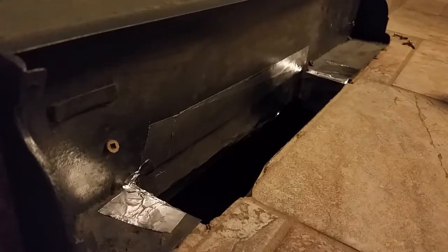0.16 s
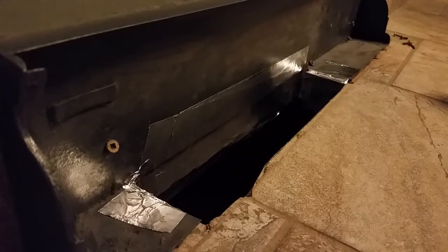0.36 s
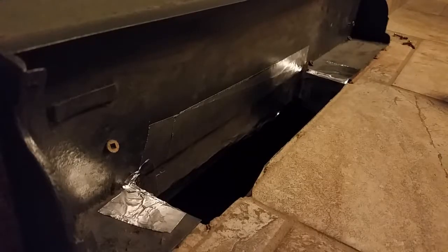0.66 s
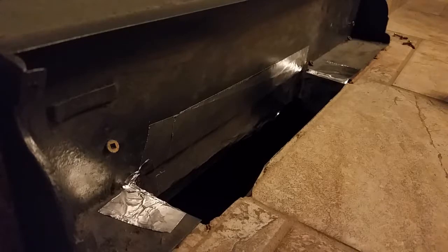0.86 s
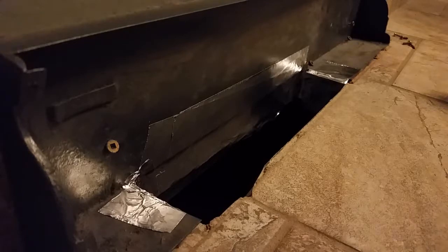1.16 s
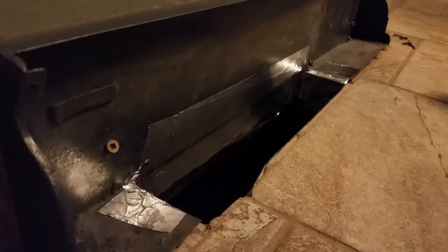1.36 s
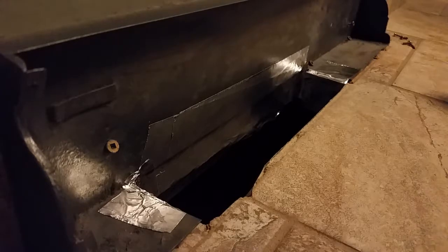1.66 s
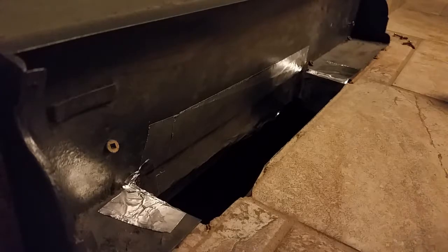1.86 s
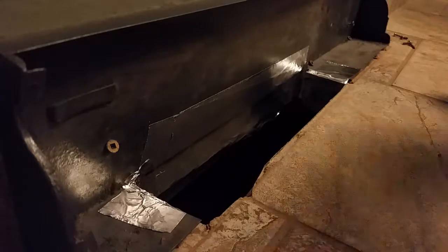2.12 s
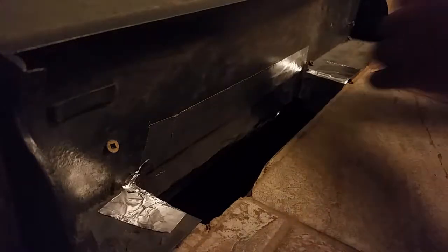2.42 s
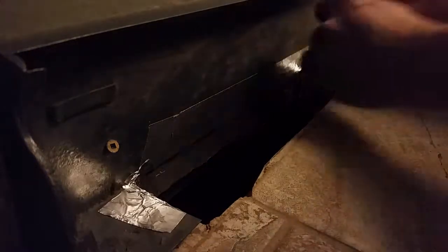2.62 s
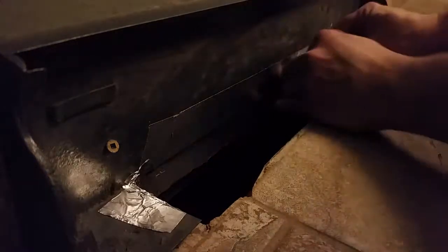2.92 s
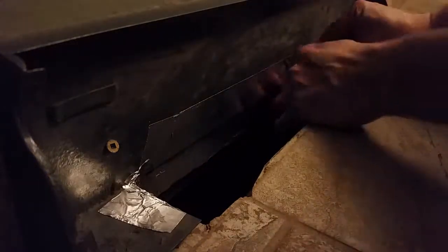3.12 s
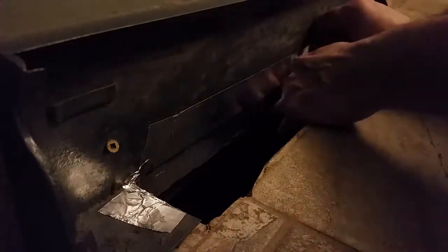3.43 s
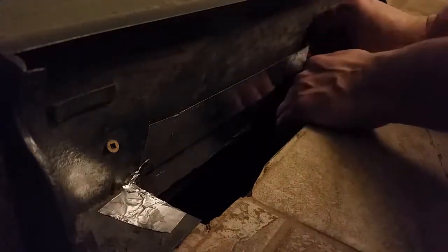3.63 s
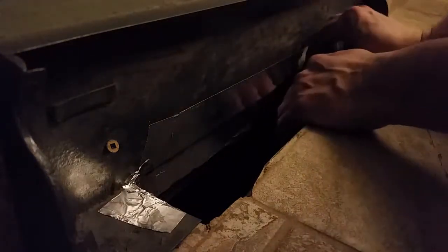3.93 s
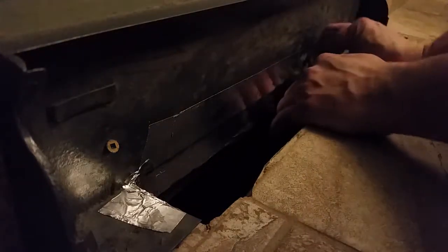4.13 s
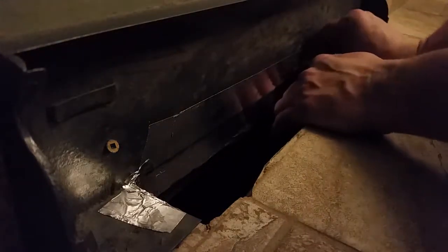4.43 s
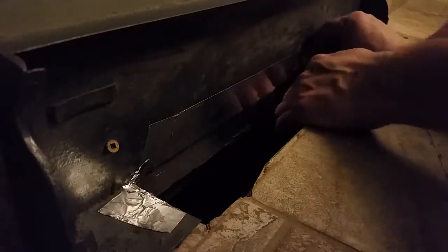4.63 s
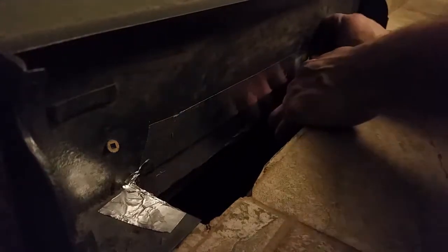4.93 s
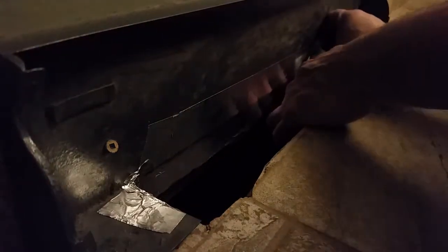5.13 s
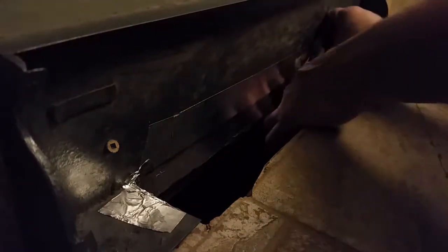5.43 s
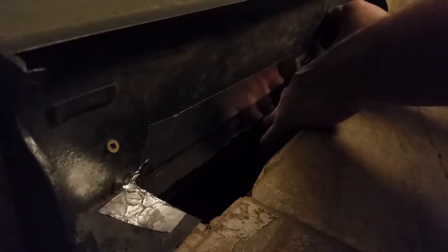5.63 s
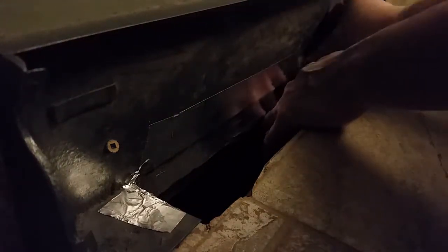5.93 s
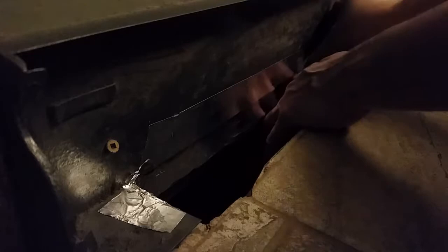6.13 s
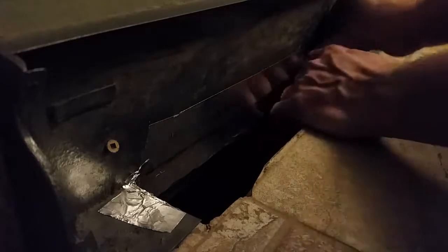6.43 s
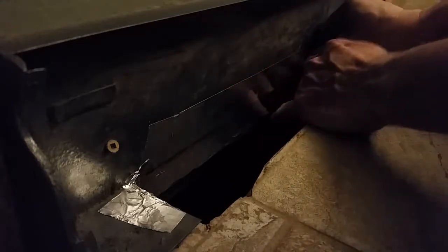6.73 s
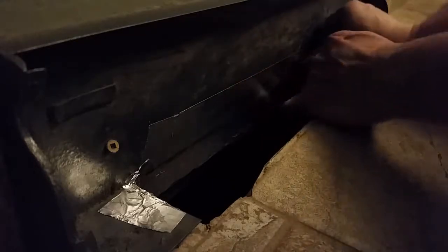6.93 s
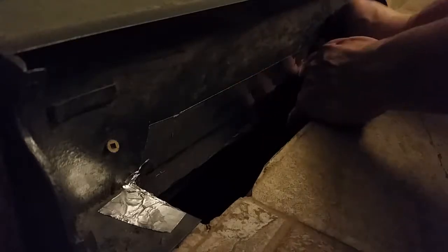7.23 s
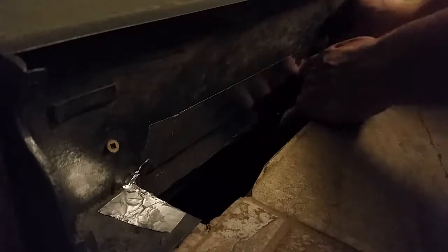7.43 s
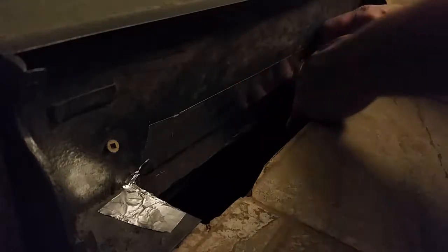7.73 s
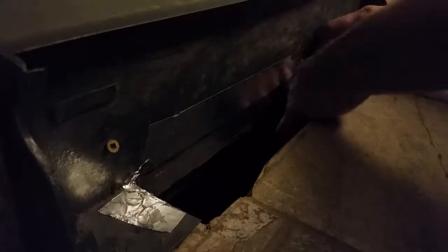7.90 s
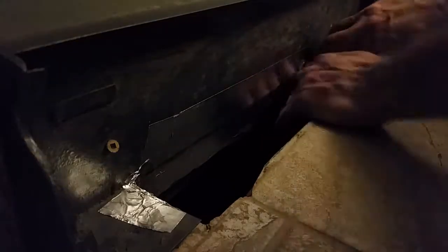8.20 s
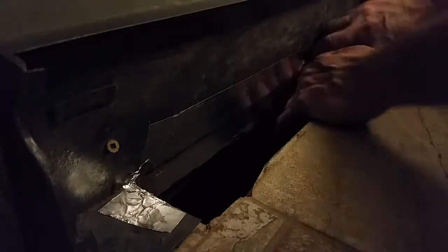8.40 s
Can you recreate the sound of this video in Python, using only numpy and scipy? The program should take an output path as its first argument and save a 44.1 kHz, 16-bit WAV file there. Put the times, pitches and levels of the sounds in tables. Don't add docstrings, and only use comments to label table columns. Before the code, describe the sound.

Close stereo pickup in a quiet tiled room with a faint low hum. Tiny foil ticks begin after half a second, then sharp bright snaps and rustling as tape is peeled. Hands press it onto sheet metal with loud crackles and dull thumps, then smooth it with hissing rubs, papery scuffs and smaller ticks.

```python
import sys
import numpy as np
from scipy import signal
from scipy.fft import rfft, irfft
from scipy.io import wavfile

SR = 44100
rng = np.random.default_rng(int(sys.argv[2]) if len(sys.argv) > 2 else 0)


def attenuation_scalar(level_db):
    decades = np.asarray(level_db, float) / 20
    return 10 ** decades


def waveform_to_disk(signal):
    frames = np.transpose(np.atleast_2d(signal))
    scaled = np.clip(frames, -1, 1) * 32767
    samples = np.round(scaled).astype(np.int16)
    wavfile.write(sys.argv[1], SR, samples)


N = 377496
SIZE, BURST = 8192, 4096
HZ = np.maximum(np.arange(SIZE // 2 + 1) * SR / SIZE, 1)
SNAP_LEAD_S = 0.004


def in_time(rows):
    s, *columns = np.transpose(rows)
    return [np.interp(np.arange(N) / SR, s, c) for c in columns]


def drift(rate):
    r = np.exp(-40 * np.pi * rate / SR)
    slow = signal.lfilter([1], [1, -2 * r, r * r], rng.standard_normal(N // 20 + 2002))
    slow = slow[2000:]
    return np.interp(np.arange(N) / 20, np.arange(len(slow)), slow / slow.std())


def two_ports(mid, side, alike):
    return np.sqrt(1 + alike) * mid + np.sqrt(1 - alike) * side * [[1], [-1]]


def pair(alike):
    mid, side = rng.standard_normal((2, N))
    return two_ports(mid, side, np.clip(alike, 0, 1)) / np.sqrt(2)


def band_pass(x, low_hz, high_hz, order=1):
    return signal.sosfilt(signal.butter(order, [low_hz, high_hz], "band", fs=SR, output="sos"), x)


def placed(sounds, times):
    out = np.zeros((2, N + sounds.shape[-1]))
    for sound, s in zip(sounds, times):
        at = int(s * SR)
        out[:, at:at + sound.shape[-1]] += sound
    return out[:, :N]


def at_hz(points):
    hz, level_db = np.array(points).T
    return np.interp(np.log(HZ), np.log(hz), level_db)


# (f [Hz], level [dB per Hz])
LEFT_PORT = [(25, 7), (100, 11.5), (300, 6), (1000, -6.5), (1450, 1), (2000, -5), (2600, -7.5),
             (4000, -5.5), (5200, -7), (7600, 3.5), (8600, -5.5), (13500, -9), (15500, 1)]
RIGHT_PORT = [(25, 10.5), (100, 14.5), (300, 3), (1000, -7), (1550, -3), (2600, -8), (4000, -16),
              (5800, -18), (8600, -3), (9600, 6), (14600, -0.5), (15500, 9)]


def through_ports(x, low_hz, high_hz):
    edges = 1 / np.sqrt((1 + (low_hz / HZ) ** 10) * (1 + (HZ / high_hz) ** 10))
    gain = attenuation_scalar(np.array([at_hz(LEFT_PORT), at_hz(RIGHT_PORT)])) * edges
    gain = gain / np.sqrt(np.mean(gain ** 2) / 2)
    cepstrum = irfft(np.log(gain + 1e-5), SIZE)
    cepstrum[:, 1:SIZE // 2] *= 2
    cepstrum[:, SIZE // 2 + 1:] = 0
    response = irfft(np.exp(rfft(cepstrum)), SIZE)[:, :int(40 * SR / low_hz)]
    return signal.oaconvolve(x, response, axes=1)[:, :N]


# (t [s], hum level [dB], rumble level [dB])
ROOM_LEVELS = [(0.0, -70.5, -79.5), (1.07, -66.5, -76), (1.4, -63, -74.5), (3.38, -60.5, -70),
               (3.69, -66, -73.5), (7.77, -62.5, -68.5), (8.56, -56, -62)]
HUM_HZ = 100


def hum():
    hum_db, rumble_db = in_time(ROOM_LEVELS)
    phase = 2 * np.pi * HUM_HZ * np.arange(N) / SR + 0.78 * drift(6.0)
    line = np.sqrt(2) * np.sin(phase) * attenuation_scalar(hum_db + 2.3 * drift(7.4)) * attenuation_scalar([[-1.5], [1.2]])
    hiss = through_ports(pair(0.05) * attenuation_scalar(-87.5), 3300, 4700)
    rumble = through_ports(pair(0.83) * attenuation_scalar(rumble_db + 3.0 + 2.2 * drift(6.6)), 22, 135)
    return line + hiss + rumble


# (t [s], weight on the panel [dB], slide over the foil [dB])
HANDS = [(0.0, -73.5, -97), (0.9, -71.5, -82.5), (1.15, -67.5, -59.5), (1.9, -63.5, -57.5),
         (2.44, -54.5, -48.5), (2.8, -59, -46), (3.27, -60.5, -61), (3.55, -58, -57.5),
         (3.77, -66.5, -72.5), (4.18, -64, -68.5), (4.56, -66.5, -73), (5.28, -62.5, -66.5),
         (5.85, -67, -72), (6.3, -65.5, -73), (6.84, -63, -78), (7.199, -63, -65), (7.75, -62.5, -61.5),
         (8.56, -55.5, -56)]
# (peak t [s], fade [s], level [dB], brightness [dB])
PEEL_STROKES = [(0.509, 0.16, -61.5, 6), (1.109, 0.086, -64, 14), (1.43, 0.11, -53.5, 8),
                (1.54, 0.21, -42, 4.5), (1.78, 0.07, -44.5, 7.5), (2.466, 0.042, -47, 8),
                (2.612, 0.24, -40.5, 7.5), (2.836, .03, -44, 5), (2.858, 0.071, -39, 1),
                (3.004, 0.16, -38.5, 2.5), (3.175, 0.08, -38, 0), (3.478, 0.054, -34.5, 4),
                (3.624, 0.073, -58, 4), (3.926, 0.054, -53.5, -1.5), (4.233, 0.073, -42, 0.5),
                (4.4, 0.13, -42, 0), (4.612, 0.03, -57.5, -3.5), (5.094, 0.1, -36.5, 0.5)]
# (peak t [s], fade [s], level [dB], brightness [dB])
RUB_STROKES = [(5.412, 0.49, -63, 1), (5.675, 0.27, -61, 0.5), (5.893, 0.079, -59, 4),
               (6.122, 0.034, -62, -4), (6.242, 0.04, -52.5, 0), (6.4, 0.57, -49.5, 5),
               (6.537, 0.26, -49, -1.5), (6.657, 0.11, -46, 1), (6.904, 0.064, -49.5, -1),
               (6.983, 0.14, -51, 5), (7.413, 0.083, -43.5, 1.5), (7.677, 0.22, -47, 2.5),
               (7.87, 0.24, -52.5, 0), (8.021, 0.03, -48, -5), (8.43, 0.19, -51, 1.5),
               (8.493, 0.031, -45.5, -3.5)]
# (peak t [s], fade [s], level [dB], brightness [dB], start t [s])
SWIPES = [(7.297, 0.09, -35, 3.5, 7.257), (7.568, 0.037, -44, -1.1, 7.55), (8.163, 0.046, -45, 2.5, 8.135),
          (0.37, .4, -90, 13, 0.25), (8.424, .03, -39.5, 0.2, 8.404), (3.33, .16, -62, 9, 3.314),
          (4.85, .16, -42.5, .4, 4.799)]
# (level [dB], share of brightness, share of level, slowness)
FOLLOW = [
    (-8, -1.7, 0.85, 1.44),
    (-4, -0.25, 1.126, 0.92),
    (0.2, 0.68, 0.97, 0.84),
    (-14.5, -0.9, 0.98, 1.6),
]
# (level [dB], share of weight, share of slide)
REST = [
    (-5, 1.31, 0.25),
    (-2.4, 0.43, 0.78),
    (1.5, -0.33, 1.23),
    (-2, 0.92, 0.015),
]
STILL_DB = [-103, -108, -83, -95]
FADE_DB, ROUNDNESS = 19, 1.014
RISE_SHARE, SWIPE_RISE_SHARE = 0.63, 1.2
BREAK_S = 0.0025


def effort(zone):
    t = np.arange(0, N + 64, 64) / SR
    rows = [(*row, -1) for row in PEEL_STROKES + RUB_STROKES] + SWIPES
    s, fade, level_db, bright_db, start = np.transpose(rows)[:, :, None]
    offset_db, by_bright, by_level, slowness = FOLLOW[zone]
    rise_share = np.where(start < 0, RISE_SHARE, SWIPE_RISE_SHARE)
    away = np.maximum(t - s, (s - t) / rise_share) / (fade * slowness)
    peak_db = offset_db + by_bright * bright_db + by_level * (level_db + 60)
    strokes = attenuation_scalar(peak_db - FADE_DB * away ** ROUNDNESS)
    strokes = strokes * np.clip((t - start) / BREAK_S, 0, 1)
    at, weight_db, slide_db = np.transpose(HANDS)
    offset_db, by_weight, by_slide = REST[zone]
    rest_db = offset_db + by_weight * (weight_db + 60) + by_slide * (slide_db + 60)
    rest = attenuation_scalar(np.interp(t, at, rest_db))
    power = attenuation_scalar(STILL_DB[zone] + 60) ** 2 + rest ** 2 + np.sum(strokes ** 2, axis=0)
    return np.interp(np.arange(N) / SR, t, 10 * np.log10(power) - 60)


# (t [s], peak level [dB], f [Hz], t60 [s])
THUMPS = [(1.311, -39.5, 100, 0.65), (1.3, -45, 302, 0.27), (1.484, -31.5, 290, 0.057),
          (1.525, -37.5, 280, 0.25), (1.83, -21, 110, 0.041), (1.91, -33, 460, 0.1),
          (2.533, -41, 500, 0.052), (2.571, -42.5, 250, 0.073), (2.64, -42.5, 200, 0.13),
          (2.688, -44, 300, 0.14), (2.86, -18, 169, 0.26), (3.035, -27.5, 202, 0.14),
          (3.153, -25, 247, 0.096), (3.406, -33, 380, 0.2), (4.226, -34.5, 237, 0.66), (4.3, -40, 85, .4),
          (4.806, -24, 825, 0.037), (5.11, -38, 375, 0.37), (6.2, -44.5, 168, 0.29),
          (6.506, -31.5, 600, 0.2), (6.861, -32.5, 400, 0.13), (7.02, -37.5, 330, 0.11),
          (7.065, -45.5, 450, 0.093), (7.22, -46, 300, .1), (7.258, -33, 151, 0.16), (7.84, -23, 148, 0.26),
          (7.87, -33, 260, .55), (8.128, -38, 209, 0.58), (8.195, -30, 171, 0.064), (8.228, -34, 145, 0.12),
          (8.486, -32, 570, 0.15)]


def thumps():
    t, sounds = np.arange(SIZE) / SR, []
    rough = rng.standard_normal((len(THUMPS), 3, SIZE))
    for (s, peak_db, hz, t60), noise in zip(THUMPS, rough):
        wobble = band_pass(noise[0] + 0.46 * noise[1:], 0.59 * hz, 1.14 * hz)
        tone = np.sin(2 * np.pi * hz * t) * attenuation_scalar(-60 * t / (0.2 * t60))
        tail = 0.32 * wobble / wobble.std() * attenuation_scalar(-60 * t / t60)
        soft_touch = 1 - np.exp(-3.0 * hz * t)
        sounds.append(attenuation_scalar(peak_db - 1.0) * (tone + tail) * soft_touch)
    knocks = placed(np.array(sounds), np.array(THUMPS)[:, 0]) * attenuation_scalar([[-1.3], [1.3]])
    knocks = signal.sosfilt(signal.butter(4, 70, "high", fs=SR, output="sos"), knocks)
    handling = pair(0.7) * attenuation_scalar(effort(zone=3) + 3.0 * drift(20))
    return knocks + through_ports(handling, 120, 600)


# (middle t [s], length [s], rms level [dB], flap f [Hz])
SCUFFS = [(4.839, 0.055, -46, 750), (4.866, 0.03, -38, 790), (4.893, 0.03, -47, 780),
          (3.856, 0.06, -57.5, 1270), (4.996, 0.034, -48.5, 780), (4.96, .02, -55, 750),
          (7.07, .06, -58.5, 1310), (6.538, 0.12, -43, 705), (6.416, 0.13, -55.5, 1420),
          (6.653, 0.11, -50, 1310), (7.312, 0.075, -42.5, 1670), (7.424, 0.052, -42.5, 1460),
          (7.66, 0.12, -47.5, 1390), (8.023, 0.03, -48.5, 1600), (8.419, 0.033, -41, 1300)]
FLAP_WIDTH = 0.07
OVERTONE_HZ, OVERTONE_DB_PER_KHZ = 680, -7
SLIP_DB = 3.5


def scuffs():
    t, sounds = np.arange(SIZE) / SR, []
    slips = rng.standard_normal((len(SCUFFS), 4, SIZE))
    for (s, length, level_db, hz), noise in zip(SCUFFS, slips):
        grain = attenuation_scalar(SLIP_DB * np.interp(t, np.arange(64) * 0.004, noise[3, :64]))
        drive, flap = grain * (noise[0] + noise[1:3]), 0
        for mode_hz, mode_db in (hz, 0), (hz + OVERTONE_HZ, OVERTONE_DB_PER_KHZ * hz / 1000):
            mode = band_pass(drive, mode_hz / (1 + FLAP_WIDTH), mode_hz * (1 + FLAP_WIDTH))
            flap = flap + attenuation_scalar(mode_db) * mode
        flap = flap * np.sin(np.pi * np.minimum(t / length, 1) ** 0.79)
        sounds.append(attenuation_scalar(level_db - 3) * flap / flap[:, t < length].std())
    return placed(np.array(sounds), [s - length / 2 for s, length, *_ in SCUFFS])


def patchy_hiss(patchy_db, rate, alike_hz):
    edges, white, out = np.geomspace(500, 19000, 17), rng.standard_normal((2, 2, N)), 0
    for k, (low, high) in enumerate(zip(edges, edges[1:])):
        mid, side = band_pass(white[k % 2], low, high, order=2)
        alike = np.clip(alike_hz / low - 0.1, 0, 0.9)
        out = out + attenuation_scalar(patchy_db * drift(rate)) * two_ports(mid, side, alike)
    return out / out.std()


def crackle(per_s, spread_db, cycles):
    sizes = attenuation_scalar(spread_db * np.minimum(rng.exponential(1, N), 2.4))
    happens = rng.random(N) < per_s * attenuation_scalar(5 * drift(30)) / SR
    clicks = sizes * happens * rng.choice([-1, 1], (2, N))
    patch, out = rng.integers(0, 20, N), 0
    for k, hz in enumerate(np.geomspace(650, 15000, 20)):
        r, w = attenuation_scalar(-60 * hz / (cycles * SR)), 2 * np.pi * hz / SR
        struck = clicks * (patch == k) + 1e-18
        out = out + hz * signal.lfilter([0, np.sin(w)], [1, -2 * r * np.cos(w), r * r], struck)
    return out / out.std()


def facets(count, spread_db, width_hz):
    noise = rng.standard_normal((count, 3, BURST))
    knots = rng.standard_normal((count, 64))
    hz = np.arange(BURST // 2 + 1) * SR / BURST
    bumps = attenuation_scalar(spread_db * np.array([np.interp(hz / width_hz, np.arange(64), k) for k in knots]))
    bumps /= np.sqrt(np.mean(bumps ** 2, axis=1, keepdims=True))
    ports = noise[:, 1:] + 0.054 * noise[:, :1]
    return irfft(rfft(ports) * bumps[:, None], BURST)


def snap_envelope(levels_db, crack_t60, tail_t60, tail_db):
    t = np.arange(BURST) / SR - SNAP_LEAD_S
    build = attenuation_scalar(60 * np.minimum(t, 0) / 0.0057)
    after = np.maximum(t, 0)
    crack = 0.68 * attenuation_scalar(-60 * after / 0.0035) + attenuation_scalar(-60 * after / crack_t60)
    tail = attenuation_scalar(tail_db)[:, None] * attenuation_scalar(-60 * after / tail_t60)
    return (attenuation_scalar(levels_db)[:, None] * build * (crack + tail))[:, None]


def evened(noise, envelope, low_hz, high_hz):
    hz = np.arange(BURST // 2 + 1) * SR / BURST
    burst = noise * envelope
    inside = rfft(burst)[..., (hz > low_hz) & (hz < high_hz)]
    got = np.mean(np.abs(inside) ** 2, axis=(1, 2), keepdims=True)
    return burst * np.sqrt(np.sum(envelope ** 2, axis=2, keepdims=True) / got)


# (t [s], peak level [dB], body re peak [dB], rustle re peak [dB])
PEEL_SNAPS = [(0.513, -31.5, -48, -37), (0.7457, -56, -15, -17), (0.8001, -58, -18, -19),
              (0.857, -50, -22, -29), (0.9163, -50, -27, -26), (0.9433, -46.5, -34, -29),
              (1.0066, -36, -43, -23), (1.0281, -32, -54, -26), (1.0854, -27, -53.5, -19),
              (1.4227, -17, -40, -23), (1.4365, -19, -40, -29), (1.478, -23.5, -35, -24),
              (1.5237, -13.5, -27, -15.5), (1.5356, -14, -28, -14), (1.5698, -22, -21.5, -20),
              (1.7444, -27, -39, -18), (1.7814, -24, -34, -19), (1.7978, -15.5, -40, -19),
              (1.9111, -16.5, -24, -21.5), (2.008, -22, -38, -20)]
LAY_SNAPS = [(2.4575, -12, -30, -11), (2.4708, -21, -23, -12), (2.4798, -25, -32, -5),
             (2.5353, -29, -30, -15), (2.602, -20, -42, -16), (2.6192, -17.5, -49, -18),
             (2.6356, -17.5, -30, -11.5), (2.6923, -16.5, -23, -16), (2.7192, -12.5, -32, -18),
             (2.844, -8, -31, -13.5), (2.8601, -22, -4, -21), (2.9909, -9, -20, -13),
             (3.034, -18.5, -10.5, -12), (3.1547, -10.5, -14.5, -14), (3.2028, -22.5, -10.5, -11),
             (3.407, -12, -24, -13.5), (3.4605, -12.5, -28, -17), (3.4762, -18, -22, -24),
             (3.4945, -18, -26, -13.5), (3.6047, -34, -24, -23), (3.8433, -35, -18, -13.5),
             (4.032, -32.5, -22, -11)]
PRESS_SNAPS = [(4.154, -45, -21, -5), (4.2266, -22, -13, -19), (4.2388, -16.5, -19, -9.5),
               (4.2844, -24.5, -16, -7.5), (4.3127, -20, -18.5, -12.5), (4.3459, -17, -17, -8),
               (4.3846, -14, -45, -15.5), (4.4545, -34, -1.5, 1), (4.5982, -50.5, 4, -17),
               (4.685, -33.5, -16, -9.5), (4.7248, -24.5, -27, -15), (4.77, -39, -2.5, -15),
               (4.788, -28.5, -34, -5), (4.801, -21, -13.5, -30), (4.8364, -28.5, -8, -11),
               (5.0719, -11.5, -14, -9.5), (5.085, -18, -27, -16), (5.101, -29, -17, -15),
               (5.1105, -13, -14.5, -7), (5.122, -21, -6, -8), (5.3957, -26, -42, -17),
               (5.5386, -38.5, -22, -22), (5.5802, -37.5, -16, -26), (5.658, -32, -48, -7),
               (5.688, -33.5, -31, -8.5), (5.7635, -37.5, -19, -9.5), (5.809, -49.5, -13, -2),
               (5.88, -28.5, -43, -15)]
SMOOTH_SNAPS = [(5.964, -33.5, -22.5, -13), (6.112, -24, -33, -21), (6.194, -33, -38, -17),
                (6.2236, -31, -20, -9.5), (6.239, -31.5, -60.5, -7.5), (6.4435, -26, -14, -11.5),
                (6.5066, -26.5, -2.5, -26), (6.69, -34, -12, -17), (6.7836, -33.5, -25, -23),
                (6.89, -28, -15, -15), (6.8962, -32, -9, -8), (6.9115, -28, -24, -7),
                (6.9205, -18, -34, -12.5), (7.09, -41, -14, -7.5), (7.4708, -26.5, -11, -5.5),
                (7.5545, -41, -47, -12), (7.841, -34, 6, -4), (8.2414, -24.5, -40, -12.5),
                (8.4051, -21.5, -12.5, -8.5), (8.4862, -30, -11, -21.5)]
# (t [s], peak level [dB], body re peak [dB], rustle re peak [dB])
GLUE_TICKS = [(.585, -49, -30, -19.5), (.7, -55, -27, -25), (0.975, -49, -41, -25), (1.04, -40, -40, -27),
              (1.2414, -40, -27, -22), (2.572, -34, -13, -15), (3.094, -29, -16, -12),
              (3.125, -31, -5, -10), (3.14, -31, -6, -14), (3.2409, -37, -18, -5), (3.3147, -37, -26, -22),
              (3.3687, -33, -24, -20), (3.3905, -24, -27, -22), (3.4, -23, -19, -15),
              (3.451, -23, -27, -16), (4.41, -35, -10, -5), (4.493, -42, -16, -14), (4.51, -42, -25, -20),
              (5.337, -41, -36, -14), (5.36, -41, -36, -15), (5.41, -42, -36, -14), (5.6465, -45, -28, -8),
              (5.7, -39, -25, -10), (5.798, -46, -28, -13), (5.8892, -30.5, -35, -13),
              (5.937, -42, -25, -18), (5.95, -36, -26, -16), (6.0782, -47, -20, -14),
              (6.118, -25.5, -23, -17), (6.205, -41, -31, -6), (6.213, -36, -35, -10),
              (6.233, -32, -23, -10), (6.25, -35, -26, -14), (6.262, -34, -28, -11), (6.279, -40, -28, -11),
              (6.8571, -44, -10, -10), (6.8733, -38.5, -14, -12), (7.2178, -51, -11, -13),
              (7.482, -41, -20, -9), (8.0146, -37, -12, -15), (8.168, -32, -17, -14),
              (8.2198, -34, -32, -18), (8.4595, -35, -10, -16)]


def creases():
    return np.transpose(PEEL_SNAPS + LAY_SNAPS + PRESS_SNAPS + SMOOTH_SNAPS + GLUE_TICKS)


# (low f [Hz], high f [Hz], crackle share, flicker [dB], crack t60 [s], tail t60 [s])
ZONES = [
    (600, 3710, 0.32, 1.0, 0.016, 0.22),
    (3910, 7220, 0.23, 1, 0.018, 0.26),
    (7990, 13400, 0.16, 2.5, 0.015, 0.18),
]
CREST_DB = [6.5, 5, 12]
TAIL_DB, TAIL_PER_BODY_DB, TAIL_PER_PEAK_DB = -13, 0.02, 0.23


def foil():
    s, peak_db, body_db, rustle_db = creases()
    tail_db = TAIL_DB + TAIL_PER_BODY_DB * body_db + TAIL_PER_PEAK_DB * peak_db
    coloured = facets(len(s), spread_db=5.2, width_hz=700)
    small = crackle(500, spread_db=2.5, cycles=3.8)
    hiss = patchy_hiss(patchy_db=3.0, rate=13.9, alike_hz=446)
    together, out = drift(26), 0
    above_peak_db = [body_db, rustle_db, 0]
    for k, (low_hz, high_hz, share, flicker_db, crack_t60, tail_t60) in enumerate(ZONES):
        rub_db = effort(k)
        share = np.clip(share * (rub_db + 81.0) / 30, 0, 1)
        rub = np.sqrt(1 - share) * hiss + np.sqrt(share) * small
        rub = rub * attenuation_scalar(rub_db + flicker_db * (0.8 * together + 0.4 * drift(40)))
        snap_db = peak_db + above_peak_db[k] - CREST_DB[k]
        envelope = snap_envelope(snap_db, crack_t60, tail_t60, tail_db)
        snaps = placed(evened(coloured, envelope, low_hz, high_hz), s - SNAP_LEAD_S)
        out = out + through_ports(rub + snaps, low_hz, high_hz)
    return out


def scene():
    return hum() + thumps() + scuffs() + foil()


def top_cut(x):
    return signal.sosfilt(signal.butter(12, 16970, fs=SR, output="sos"), x)


def record(dry):
    low_pass = signal.cheby2(16, 42, 15900, fs=SR, output="sos")
    mix = signal.sosfilt(low_pass, dry)
    return top_cut(mix)


dry = scene()
out = record(dry)
waveform_to_disk(out)
```